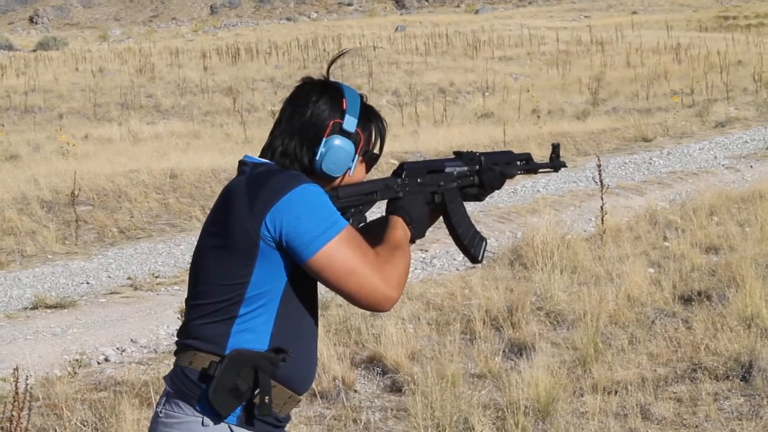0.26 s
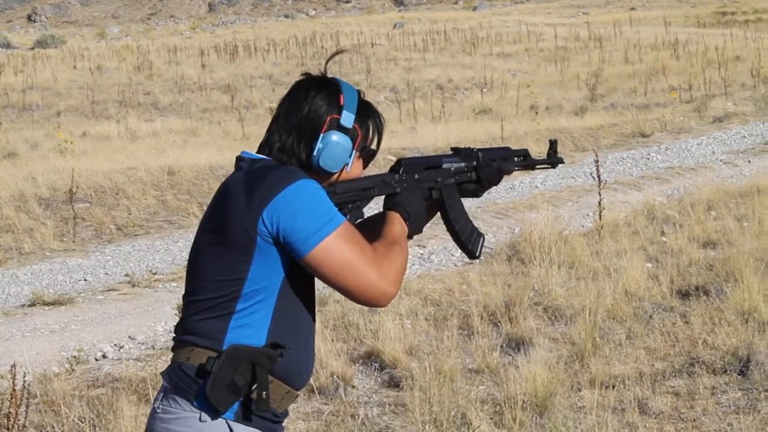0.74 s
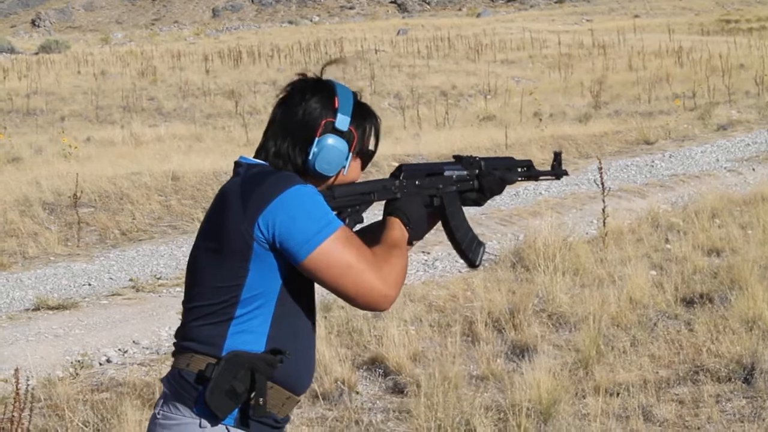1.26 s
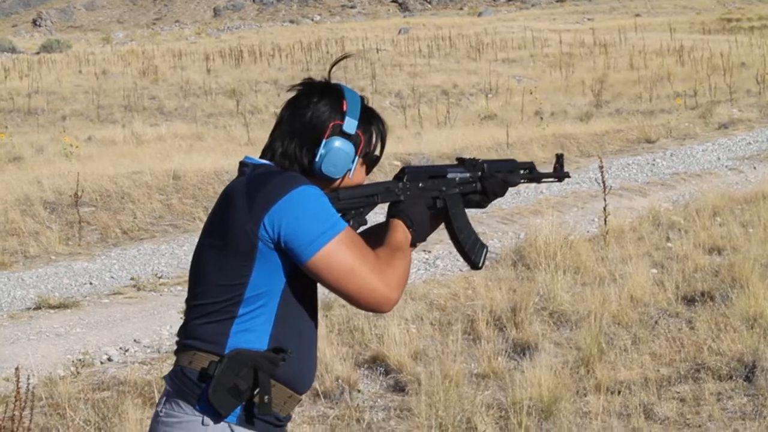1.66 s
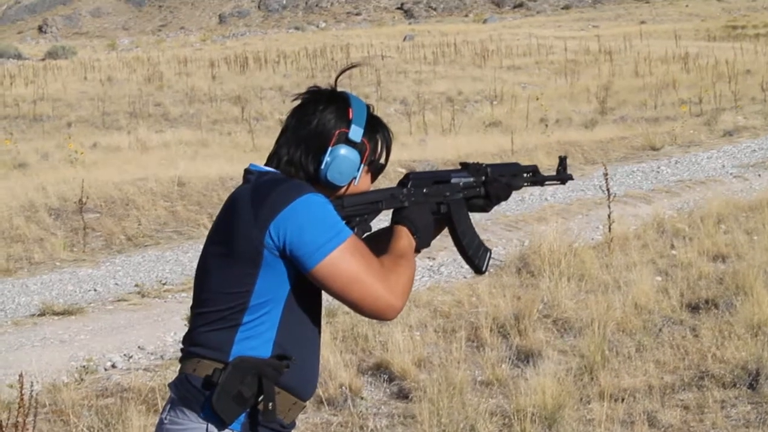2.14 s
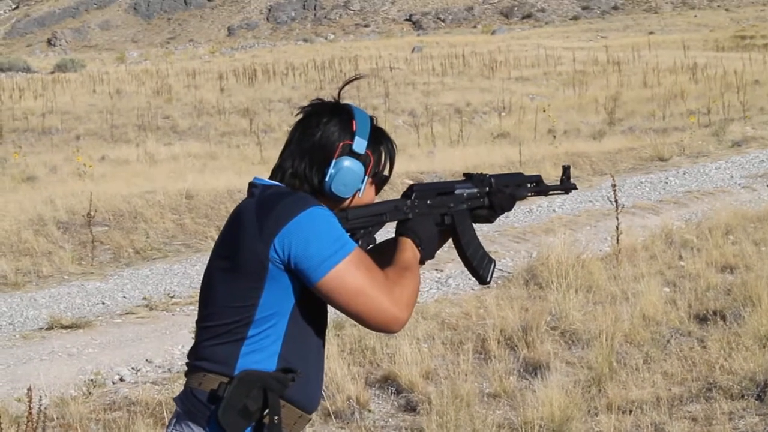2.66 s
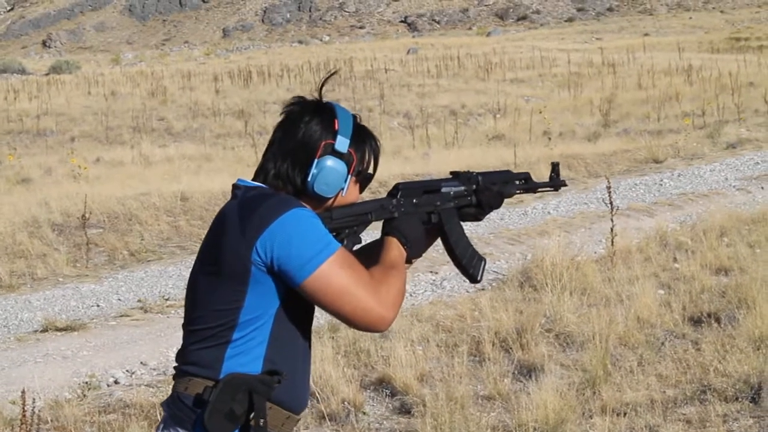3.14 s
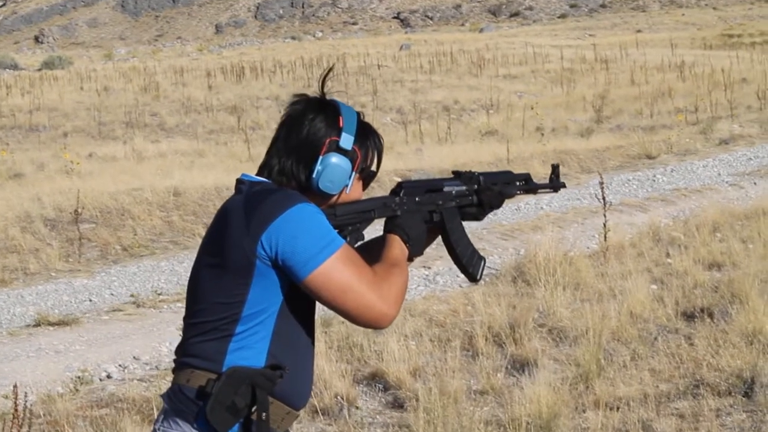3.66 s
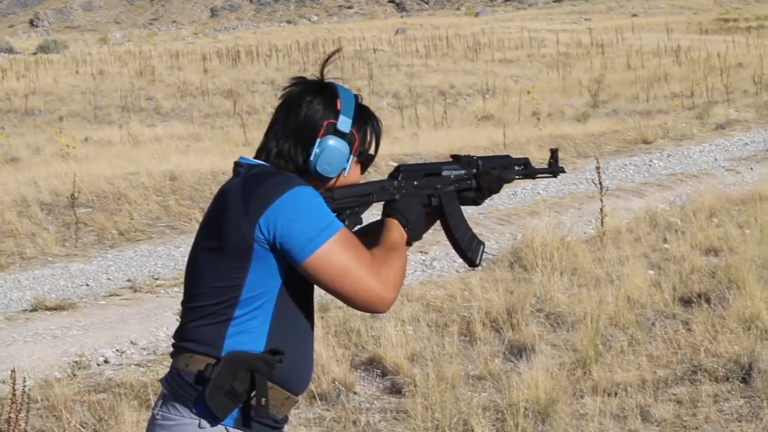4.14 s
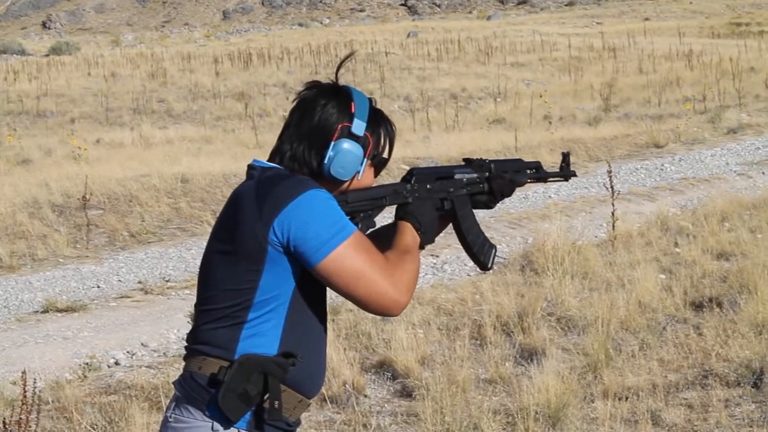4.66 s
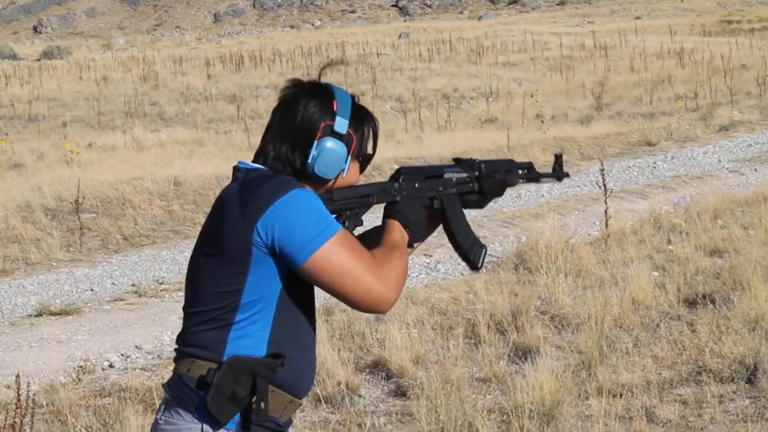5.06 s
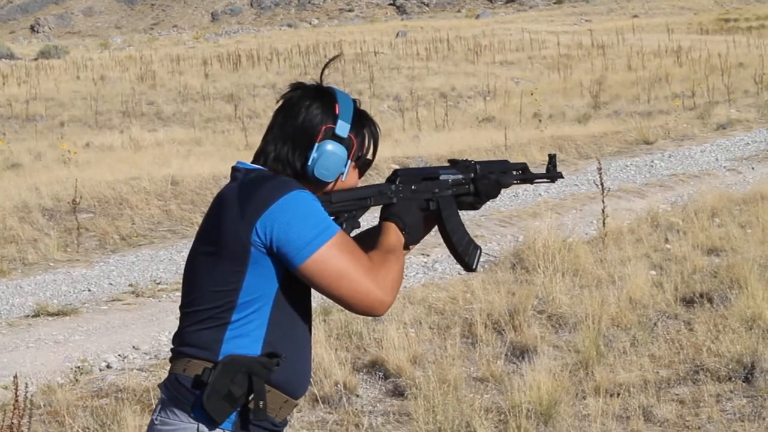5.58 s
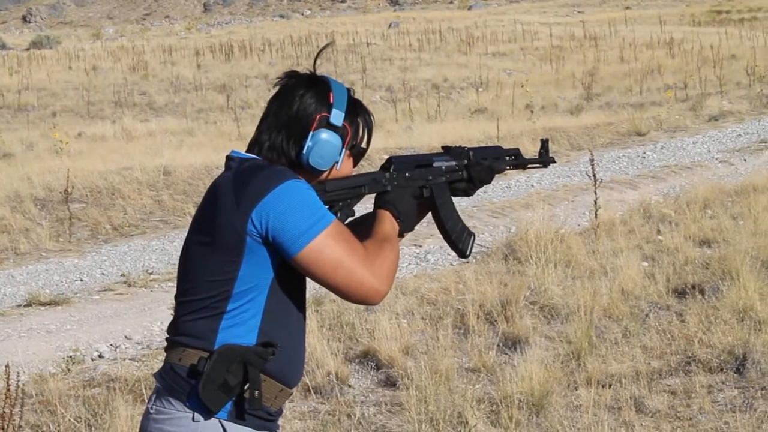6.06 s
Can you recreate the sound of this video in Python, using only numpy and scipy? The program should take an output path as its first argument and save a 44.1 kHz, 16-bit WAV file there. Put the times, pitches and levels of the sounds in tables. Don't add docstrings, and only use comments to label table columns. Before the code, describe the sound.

Wind bumps and dry grass ticks, then three harsh close gunshots with steel bolt clacks, rolling echoes, bright case rings and a falling ricochet whine.

```python
import sys
import numpy as np
from scipy import signal
from scipy.fft import rfft, irfft, next_fast_len
from scipy.io import wavfile
from scipy.ndimage import map_coordinates

SR = 44100
rng = np.random.default_rng(int(sys.argv[2]) if len(sys.argv) > 2 else 0)


def digitize_waveform(pressure):
    field = np.atleast_2d(pressure).T
    bounded = np.clip(field, -1, 1)
    quanta = np.round(bounded * 32767).astype(np.int16)
    wavfile.write(sys.argv[1], SR, quanta)


def invert_db(x):
    u = np.asarray(x, float) / 20
    return 10 ** u


N = 278271

# (time [s], blast before overload [dB], length [s], pressure push [dB], hammer fall [dB])
SHOTS = [
    (1.163, 2.5, 0.0041, -11.5, -35),
    (2.914, 3, 0.0044, -7.5, -35.5),
    (4.968, 4.998, 0.0037, -8, -36),
]
GAIN_SLACK_DB = [8.2, 0.25, 3.8, 2.3, .3]
# (time [s], level [dB])
CLEAR_DB = [(1.2, 1), (1.232, -8.5), (1.245, 1.5), (1.27, 2), (1.3, -16.5), (1.52, -12.5), (1.6, -1.5),
            (2.95, 2), (2.985, -3), (3.0, 4.5), (3.055, 5.5), (3.08, -1), (3.14, -2.5), (3.25, -6),
            (3.35, -0.5), (5.07, -0.5), (5.085, -4), (5.13, -7), (5.2, -2), (5.3, 1.5)]


def unit(x):
    return x / np.sqrt(np.mean(x ** 2) + 1e-20)


def curves(rows):
    s, *cols = np.transpose(rows)
    return [np.interp(np.arange(N) / SR, s, c) for c in cols]


def filtered(x, response):
    m = next_fast_len(len(x) + 8192)
    return irfft(rfft(x, m) * response(np.fft.rfftfreq(m, 1 / SR)), m)[:len(x)]


def peak(hz, width_hz):
    return lambda f: 1j * f * width_hz / (hz * hz - f * f + 1j * f * width_hz)


def wobble(rate):
    return map_coordinates(rng.standard_normal(int(N * rate / SR) + 4), [np.arange(N) * rate / SR])


def noise(spectrum, lo, hi):
    f, db = np.transpose(spectrum)
    colour = lambda hz: invert_db(np.interp(np.log(hz + 1), np.log(f), db, right=-120))
    x = filtered(rng.standard_normal(N), colour)
    return x / np.std(filtered(x, lambda hz: (hz > lo) & (hz < hi)))


def add(track, s, sound):
    track[round(s * SR):][:len(sound)] += sound


def sounding(rows):
    start, end = rows[0][0], rows[-1][0]
    return np.interp(np.arange(N) / SR, [start - .002, start, end - .04, end], [0, 1, 1, 0])


def summed(*levels_db):
    return 10 * np.log10(sum(invert_db(db) ** 2 for db in levels_db))


def swell(age, first_db, swell_s, full_db, held_s, fall):
    rise_db = np.interp(age, [0, swell_s], [first_db, full_db])
    return rise_db - fall * np.maximum(age - max(held_s, swell_s), 0)


def repeated(x):
    since = np.arange(N) - np.round(np.array(SHOTS)[:, :1] * SR).astype(int)
    return x[np.where(since < 0, np.arange(N), since).min(axis=0)]


def thumps():
    # (time [s], peak [dB], frequency [Hz])
    eddies = [(.129, -44.5, 62), (0.385, -33.5, 135), (.503, -43, 100), (0.519, -39.5, 123),
              (0.541, -44, 100), (.72, -40.5, 80), (.759, -44, 88), (.848, -47.5, 62), (2.003, -22.5, 178),
              (2.13, -39, 166.4), (2.462, -33, 137.3), (2.476, -33, 150.3), (2.496, -34, 129.7),
              (2.539, -37.5, 141), (2.61, -35, 196), (3.708, -27.5, 183), (3.723, -37, 260),
              (3.798, -33, 226), (3.87, -28.5, 134), (3.917, -32, 169), (4.0288, -22, 220),
              (4.0405, -29, 240), (4.056, -37, 136), (4.212, -34.5, 163), (4.666, -38.5, 129),
              (4.735, -38, 150), (4.767, -25, 146), (4.827, -35.5, 156), (4.917, -38, 201),
              (4.931, -31, 210), (5.42, -27, 260), (5.713, -29.5, 186.5)]
    # (frequency [Hz], density [dB per Hz])
    buffet_colour = [(12, -40), (20, -6), (113, -4), (140, -0.5), (180, -28.5), (310, -120)]
    # (time [s], level [dB])
    buffet_level = [(0.0, -72.5), (0.7, -69.5), (0.88, -75.5), (2.02, -53), (2.56, -60.5), (2.67, -70.5),
                    (3.73, -52), (4.43, -65.5), (5.309, -48), (5.57, -50.5), (5.87, -63.5), (6.31, -72)]
    out, t = np.zeros(N + SR), np.arange(3000) / SR
    for s, db, hz in eddies:
        cycles = np.clip(0.9 - 0.012 * (db + 37.5), .3, 1.2)
        u = (t - .012) * hz / cycles
        puff = unit(filtered(rng.standard_normal(len(t)), lambda f: peak(2 * hz, 2 * hz)(f) ** 4))
        push_pull = np.sin(2 * np.pi * hz * (.012 - t))
        add(out, s, invert_db(db + 3.0) * np.exp(-3 * u * u) * (push_pull + 0.099 * puff))
    buffet_db = curves(buffet_level)[0] + 6 + 2.7 * wobble(15)
    return out[:N] + invert_db(buffet_db) * unit(noise(buffet_colour, 25, 120))


def ticks():
    # (time [s], peak [dB], low knock [dB], t60 [s])
    crunches = [(0.029, -38, -32, 0.012), (0.0666, -43, -1, 0.043), (0.0904, -38, 3.5, 0.11),
                (0.1076, -37, -8, 0.05), (.153, -35, -3, 0.1), (.214, -45, -8, .03), (0.222, -47, 0, 0.055),
                (0.3032, -45, -17, 0.035), (0.5366, -50, -6, 0.034), (0.7369, -35.5, -2.5, 0.085),
                (0.7635, -43, -22, 0.023), (0.776, -45, -6, 0.054), (.8028, -43, -4, 0.098),
                (0.8692, -42, -10, 0.032), (0.8897, -42, -24, 0.013), (.9239, -48, -10, .03),
                (.9488, -43, -5, 0.056), (1.0272, -41.5, -4.5, 0.033), (1.1003, -47, -8, 0.066),
                (1.113, -43, -5.5, .06), (1.753, -41.5, -7, .053), (1.953, -26, -2.5, 0.073),
                (2.636, -57, 18.5, 0.1), (3.688, -34, -10, 0.035), (3.7188, -57, 13, 0.03),
                (3.8247, -45, -9, 0.03), (3.877, -46, -4, .025), (4.024, -52, 4, .03),
                (4.5132, -31, -8, 0.035), (4.6275, -49, -8.5, 0.029), (4.669, -52.5, -1.5, .04),
                (4.724, -42.5, -15.5, 0.039), (4.8945, -37, -9, 0.045), (4.9182, -36, -10.5, .03),
                (4.941, -45, -16, .03), (5.9252, -47, 10, 0.053)]
    # (time [s], level [dB])
    scuff = [(4.8, -82.5), (4.825, -52), (4.87, -55.5), (4.92, -58.5), (4.96, -66)]
    out, t = np.zeros(N + SR), np.arange(4000) / SR
    for s, db, low_db, t60 in crunches:
        def colour(f):
            low = invert_db(low_db + 9.0) * peak(900, 600)(f) ** 3
            high = .6 * peak(3200, 3000)(f) ** 3
            middle = peak(1750, 350)(f) - peak(2450, 400)(f)
            return low + high + middle + invert_db(-23.5) * peak(6500, 4000)(f) ** 4
        grit = rng.standard_normal(len(t)) * invert_db(3 * rng.standard_normal(100).repeat(40))
        envelope = (1 - np.exp(-t / 0.0013)) * invert_db(-60 * t / np.clip(t60, .01, .3))
        crunch = filtered(grit * envelope, colour)
        add(out, s, invert_db(db - 3.5 + max(low_db, 0)) * crunch / np.abs(crunch).max())
    cloth = unit(filtered(rng.standard_normal(N), lambda f: peak(1400, 1500)(f) ** 3))
    return out[:N] + invert_db(curves(scuff)[0] + 0.96 * wobble(90)) * sounding(scuff) * cloth


def knocks():
    # (time [s], peak [dB], frequency [Hz], t60 [s])
    taps = [(0.087, -44, 420, 0.047), (.108, -41, 455, 0.041), (0.158, -48, 810, 0.078),
            (.227, -52, 497, 0.045), (0.726, -44.5, 330, 0.033), (4.512, -45, 600, 0.042),
            (.737, -41.5, 957, 0.033), (0.747, -48, 990, 0.036), (.775, -38, 910, 0.019),
            (0.7746, -42, 1720, 0.021), (.803, -38.5, 940, 0.018), (0.802, -44, 1740, 0.025),
            (.846, -55, 1750, .03), (0.865, -47.5, 1740, 0.03), (.871, -51, 800, 0.032),
            (2.456, -35, 140, .12), (2.499, -38.5, 140, .08), (2.515, -39, 140, .12),
            (2.641, -28, 1050, .012), (2.664, -39.5, 100, .08), (3.718, -40, 800, 0.019),
            (3.85, -34, 149.8, .06), (3.89, -39, 150, .06), (4.024, -44, 700, .02),
            (4.047, -31, 220, 0.054), (4.108, -40, 328, .03), (4.109, -46, 1000, .015),
            (4.195, -39, 151, .06), (4.411, -39.5, 140, .06), (4.667, -41, 600, 0.019),
            (4.7875, -8, 412, 0.014), (4.788, -28.5, 940, 0.0094), (4.794, -26.5, 105, 0.086),
            (4.82, -38, 131, .1), (3.137, -37, 2310, 0.025), (3.148, -36, 2820, 0.043),
            (4.977, -17.5, 1729, 0.069), (5.715, -37, 60.7, 0.21)]
    out, t = np.zeros(N + SR), np.arange(8000) / SR
    for s, db, hz, t60 in taps:
        envelope = invert_db(db + 4.0 - 60 * t / t60) * (1 - np.exp(-t * hz / 1.2))
        add(out, s, envelope * np.sin(2 * np.pi * hz * t))
    return out[:N]


def echo_levels():
    # (level [dB], held [s], fade [dB per s], far hills [dB], their fade [dB per s])
    echo_law = [
        (-28.5, 0.28, 104, -32, 25.5),
        (-23, .06, 60, -53, 9),
        (-28, 0.007, 79.5, -62.5, 14.5),
        (-32.5, 0.0076, 86.5, -74.5, 13),
        (-40.5, 0.1203, 138, -93, 13.5),
    ]
    # (time [s], gain [dB])
    gain_moves = [
        [(1.165, -3.5), (1.22, 0), (1.242, -5), (1.254, -14.5), (1.304, -18), (1.362, -9), (1.464, -7.5),
         (1.6, -10), (1.9, -1.8)],
        [(2.916, 0), (2.981, -2), (2.99, 0), (3.053, -19.5), (3.09, -12.5), (3.125, -6.5), (3.245, -10.5),
         (3.5, -7.5), (3.8, -5.5)],
        [(4.97, 0.8), (5.038, -2.5), (5.068, -4.5), (5.075, -9.5), (5.13, 3.5), (5.26, -0.2), (5.384, -5.5),
         (5.54, -5.5), (5.75, -2.5)],
    ]
    gain_share = [.9, 1.2, 1.01, .8, 0.83]
    # (time [s], strength [dB])
    wind = [(0, -59), (.29, -64.5), (.646, -65), (.886, -63), (1.15, -64), (1.98, -57), (2.2, -60.5),
            (2.51, -78), (2.66, -62.5), (2.9, -77.5), (3.76, -59.5), (4.13, -56), (4.63, -60),
            (4.83, -60.5), (4.95, -57.5), (5.78, -53.5), (6.31, -58)]
    # (level at calm strength [dB], growth [dB per dB])
    wind_law = [
        (-66.5, 0.2),
        (-60, 1),
        (-74.5, 0.38),
        (-80, 0.17),
        (-96.5, 0.4),
    ]
    calm_strength_db = -60
    gain_db, = curves(np.vstack(gain_moves))
    wind_db, = curves(wind)
    ages = np.arange(N) / SR - np.array(SHOTS)[:, :1] - .006
    age = np.where(ages < 0, 9, ages).min(axis=0)
    levels_db = []
    for law, share, slack_db, (calm_db, growth) in zip(echo_law, gain_share, GAIN_SLACK_DB, wind_law):
        db, held, fade, far_db, far_fade = law
        returns_db = summed(db - fade * np.maximum(age - held, 0), far_db - far_fade * age)
        ducked_db = returns_db + share * (gain_db + np.clip(-gain_db, 0, slack_db))
        breeze_db = calm_db + growth * (wind_db - calm_strength_db)
        levels_db.append(summed(ducked_db, breeze_db))
    return gain_db, levels_db


def slaps(gain_db):
    # (delay [s], peak [dB])
    far_faces = [(.145, -19), (.215, -21), (.245, -24), (.27, -23), (.306, -22.5), (.323, -19.5),
                 (.386, -27.5), (0.44, -33), (0.57, -41.5)]
    # (delay [s], peak [dB])
    near_faces = [(.0126, -15.5), (.0235, -17), (.0295, -17), (.0356, -10.5), (.0445, -11.5),
                  (.0496, -11.5), (.0515, -15), (.0575, -15), (.067, -16.5), (.0748, -12.5)]
    out, t = np.zeros(N), np.arange(-600, 600) / SR
    for faces, hz, cycles in ((far_faces, 272, 2), (near_faces, 600, 1.3)):
        pulse = np.exp(-3 * (t * hz / cycles) ** 2) * np.sin(2 * np.pi * hz * t)
        for s, *_ in SHOTS:
            for delay, db in faces:
                add(out, s + delay + t[0], invert_db(db) * pulse)
    return out * invert_db(gain_db + np.clip(-gain_db, 0, GAIN_SLACK_DB[0]))


def echo_rumble(rumble_db, lumps):
    # (frequency [Hz], density [dB per Hz])
    rumble_colour = [(35, -50.5), (60, -21), (162, -7), (203, 0.5), (275, -2), (366, -13), (420, -10.5),
                     (550, -40.5), (920, -120)]
    rumble = unit(invert_db(1.8 * lumps) * noise(rumble_colour, 130, 380)) * invert_db(rumble_db)
    rumble = filtered(rumble, lambda f: (1j * f / (90 + 1j * f)) ** 2)
    near_share = np.clip((rumble_db + 48.5) / 16, 0, 1)
    near = invert_db(rumble_db) * repeated(rumble / invert_db(rumble_db))
    far = 1.61 * filtered(rumble, peak(140, 140))
    return near_share * near + (1 - near_share) * far


def echo_body(body_db, lumps):
    # (frequency [Hz], density [dB per Hz])
    body_colour = [(190, -35.5), (330, -3.5), (517, -1), (752, -2), (933, -12), (1500, -10.5),
                   (1950, -36.5), (3300, -120)]
    # (frequency [Hz], density [dB per Hz])
    breeze_colour = [(190, -34), (330, -7), (453, -2.5), (590, 1), (774, -6.5), (981, -5.5), (1280, -12),
                     (1600, -14.5), (2080, -43), (3520, -120)]
    build_db, build_s = 5, .04
    shot_share = np.clip((body_db + 56.5) / 12, 0, 1)
    returns = np.sqrt(shot_share) * repeated(noise(body_colour, 400, 1150))
    breeze = np.sqrt(1 - shot_share) * noise(breeze_colour, 400, 1150)
    missing = np.clip(2 - 2 * repeated(np.arange(N) / SR) / build_s, 0, 1)
    level_db = body_db - build_db * missing + 1.2 * lumps + 1.5 * wobble(90) - .6
    return (returns + breeze) * invert_db(level_db)


def echo_treble(edge_db, air_db, top_db):
    # (frequency [Hz], density [dB per Hz])
    edge_colour = [(710, -26), (1200, 0), (1420, -5.5), (1700, 2.5), (1900, 0), (4500, -9), (5850, -37),
                   (9900, -120)]
    air_colour = [(2240, -28.5), (3800, -4), (5840, -4.5), (6670, -6), (9000, -13.5), (11700, -46.5),
                  (19800, -120)]
    top_colour = [(5000, -30.5), (8500, -5), (10800, -8), (13300, -6), (15800, -14.5)]
    edge = invert_db(edge_db + 1.3 * wobble(70) - 0.46) * noise(edge_colour, 2093, 2650)
    flutter_db = 1.9 * wobble(80)
    air = invert_db(air_db + flutter_db - 0.44) * noise(air_colour, 5290, 6120)
    top_level_db = top_db + 1.4 * flutter_db - 1 + curves(CLEAR_DB)[0]
    return edge + air + invert_db(top_level_db) * unit(noise(top_colour, 9000, 15000))


def echo():
    gain_db, (rumble_db, body_db, *treble_db) = echo_levels()
    lumps = repeated(wobble(55))
    low = echo_rumble(rumble_db, lumps) + echo_body(body_db, lumps)
    return slaps(gain_db) + low + echo_treble(*treble_db)


def whine():
    # (time [s], frequency [Hz], level [dB])
    glides = [
        [(1.34, 2800, -56), (1.39, 3040, -47), (1.46, 3300, -60), (1.49, 3330, -70)],
        [(1.41, 2050, -55), (1.46, 2360, -53), (1.53, 2250, -58), (1.61, 2314, -57), (1.73, 2070, -67)],
        [(1.46, 1600, -68), (1.52, 2000, -51), (1.57, 2220, -60)],
        [(5.17, 1327, -37), (5.27, 1168, -40), (5.4, 982, -51), (5.56, 709.5, -58), (5.8, 572.5, -57.5)],
    ]
    out = np.zeros(N)
    for rows in glides:
        hz, db = curves(rows)
        phase = 2 * np.pi * np.cumsum(hz + 28 * wobble(150)) / SR
        harmonics = (hz < 1400) * (0.33 * np.sin(2 * phase) + 0.24 * np.sin(3 * phase))
        out += sounding(rows) * invert_db(db + 1.5 * wobble(56)) * (np.sin(phase) + harmonics)
    return out


def glints():
    # (from [s], loudest [s], until [s], frequency [Hz], level [dB])
    flashes = [(1.35, 1.435, 1.495, 4930, -29), (1.34, 1.37, 1.41, 4610, -48),
               (1.49, 1.54, 1.68, 4795, -63), (1.41, 1.46, 1.485, 9010, -58),
               (1.26, 1.33, 1.42, 11480, -52), (1.26, 1.3, 1.47, 9400, -56), (1.26, 1.28, 1.46, 15400, -60),
               (1.27, 1.36, 1.42, 14730, -64), (1.28, 1.33, 1.48, 12320, -58),
               (1.26, 1.28, 1.32, 13580, -56), (1.26, 1.29, 1.39, 10900, -55),
               (1.27, 1.35, 1.41, 8850, -56), (1.55, 1.585, 1.62, 6510, -64),
               (1.36, 1.42, 1.51, 13090, -56), (1.36, 1.43, 1.48, 10040, -60),
               (3.02, 3.042, 3.068, 3375, -36), (3.03, 3.075, 3.12, 2750, -44),
               (3.09, 3.125, 3.175, 2760, -46), (3.088, 3.105, 3.13, 1920, -43),
               (3.03, 3.065, 3.13, 4190, -35), (3.1, 3.125, 3.165, 4220, -34),
               (3.04, 3.055, 3.08, 4290, -41), (3.09, 3.098, 3.11, 4150, -36),
               (2.995, 3.002, 3.014, 4770, -25), (3.02, 3.035, 3.06, 4900, -34),
               (3.12, 3.165, 3.225, 4928, -39), (3.1, 3.14, 3.19, 3380, -45),
               (3.025, 3.04, 3.07, 6200, -44), (3.2, 3.25, 3.32, 11780, -82),
               (3.02, 3.037, 3.06, 13050, -46), (3.025, 3.045, 3.06, 15200, -50),
               (3.03, 3.05, 3.085, 10350, -49), (3.12, 3.17, 3.25, 13100, -60),
               (3.14, 3.18, 3.21, 8170, -47), (3.02, 3.04, 3.06, 9400, -50)]
    out, flicker, shake = np.zeros(N), wobble(70), wobble(80)
    for start, top, end, hz, db in flashes:
        at = np.arange(round(start * SR), round(end * SR))
        t, own = at / SR, (at + rng.integers(N)) % N
        window = np.sin(np.interp(t, [start, top, end], [0, np.pi / 2, 0])) ** 2
        tone = np.sin(2 * np.pi * hz * t + .6 * shake[own])
        out[at] += invert_db(2.5 + db + 2.5 * flicker[own]) * window * tone
    return out


def cases():
    # (ejected [s], ring lasts [s], low tone lasts [s], final pitch ratio [1], first sag of it [1])
    ejections = [
        (1.244, 0.42, 0.42, .9998, .001),
        (2.994, .31, 0.56, 1, .007),
    ]
    # (first [dB], swell [s], full [dB], held until [s], fall [dB per s])
    swells = [
        [(-29.5, 0.093, -36, .105, 800.5), (-21.5, .104, -22.5, 0.17, 601.5), (-36, 0.09, -38, 0.18, 298),
         (-64.5, .164, -45, 0.19, 188)],
        [(-17.5, .036, -22.5, .037, 684), (-35.5, .065, -20, 0.13, 520), (-41, 0.04, -23.5, 0.164, 520),
         (-69.5, 0.16, -46.5, .145, 46)],
    ]
    # (time [s], level [dB])
    facings = [
        [(1.27, -40.5), (1.32, -48), (1.486, -26), (1.522, -59.5), (1.548, -33.5), (1.612, -47.5), (1.686, -75),
         (1.802, -62.5), (1.87, -88.5)],
        [(3.02, -44), (3.056, -33.5), (3.102, -54.5), (3.144, -42), (3.174, -43.5), (3.538, -63), (3.57, -92),
         (3.64, -69), (3.76, -90)],
    ]
    # (turn [s], first peak [s])
    tumble = [
        (0.062, 0.055),
        (.075, 0.059),
    ]
    # (high [Hz], low [Hz])
    long_hz = [
        (7793, 1276),
        (7798, 1276),
    ]
    mouth_hz = [1952, 2757]
    main_hz = [4795, 4926, 4212, 3385, 4441, 4690, 6503, 9590, 10045, 11150, 12026, 12500, 13105]
    upper_hz = [8180, 7018, 10390, 11780, 12960, 14160, 15075]
    # (in first case [dB], in second case [dB], extra fade [dB per s])
    mouth = [(0, -1.5, -0.5), (-5, -41, -1)]
    main = [(1, -3, 3), (-20, -22.5, -0.5), (-6.5, -31, 151.5), (-39, -46, 80.5), (-25, -29, 58.5),
            (-32, -26.5, 59.5), (-25, -23, 86.5), (-37, -44, 60), (-34, -41, 52), (-36.5, -45, 50),
            (-29.5, -38.5, 67.5), (-34.5, -41.5, 99.5), (-29.5, -32.5, 20)]
    upper = [(6, 0.6, 51), (-12, -9, 70), (-25.5, -29.5, 58.5), (-27.5, -37, 60), (-24.5, -32, 60.5),
             (-17, -24, 100), (-21, -28.5, 80)]
    after = [-65.5, -57, -57]
    settle_s, dip_db = 0.051, -13.5
    out, t = np.zeros(N), np.arange(N) / SR
    for which, (s, lasts, low_lasts, ratio, droop) in enumerate(ejections):
        rows, facing = swells[which], facings[which]
        turn_s, peak_s = tumble[which]
        age = np.maximum(t - s, 0)
        clock = np.cumsum(ratio - droop * np.exp(-age / settle_s)) / SR
        shake = wobble(70)
        clear = np.clip((age - .022) / .008, 0, 1)
        ringing = sounding([[s], [s + lasts]])
        for tones, modes, row, after_db in zip((mouth_hz, main_hz, upper_hz), (mouth, main, upper), rows, after):
            level_db = np.maximum(swell(age, *row), after_db)
            if tones is upper_hz:
                turning = np.abs(np.cos(np.pi * (age - peak_s) / turn_s))
                level_db += 20 * np.log10(turning + invert_db(dip_db))
            for k, (hz, (*db, fade)) in enumerate(zip(tones, modes)):
                flicker_db = (3.5 if k else .8) * wobble(25) - 1.5 * np.maximum(-52 - level_db, 0)
                mode_db = 4.5 + level_db + db[which] - fade * np.minimum(age, .22) + flicker_db
                tone = np.sin(2 * np.pi * hz * clock + (.3 if k else .1) * shake)
                out += ringing * invert_db(mode_db) * (clear if hz > 9000 else 1) * tone
        high_hz, low_hz = long_hz[which]
        out += sounding(facing) * invert_db(3.0 + curves(facing)[0]) * np.sin(2 * np.pi * high_hz * clock)
        low_size = sounding([[s], [s + low_lasts]]) * invert_db(5.0 + swell(age, *rows[3]))
        out += low_size * np.sin(2 * np.pi * low_hz * t)
    return out


def bolt():
    # (time [s], peak [dB], length [s], clank [dB], brightness [Hz])
    contacts = [(1.189, -20, .004, -20, 8970), (1.24, 8, 0.0015, 3, 5000), (1.243, -28, .022, -8, 8000),
                (1.257, -25, .006, -21, 8030), (2.943, -18.5, 0.0044, -22, 9015),
                (2.991, 0, .0018, 15, 4500), (3.011, -14, 0.0037, -12, 6000), (3.02, -38, .08, 6, 3200),
                (4.998, -25, 0.0055, -13, 8050), (5.0471, -5.5, 0.0017, -9.5, 2990),
                (5.016, -14, .002, -7, 4000), (5.057, -21, 0.013, -12.5, 5930),
                (5.065, -10.5, 0.0043, -11.5, 5010), (5.115, -15, 0.0036, 0, 5800),
                (5.105, -48, .09, 22, 2000)]
    # (frequency [Hz], width [Hz], level [dB])
    receiver = [(1830, 500, 2.5), (2530, 1100, -7)]
    out, t = np.zeros(N), np.arange(8000) / SR
    for s, db, length, clank_db, bright_hz in contacts:
        burst = rng.standard_normal(len(t)) * invert_db(db - 9.9 * (t / length) ** 1.6)
        clank = lambda f: sum(invert_db(level + 6.5) * peak(c, w)(f) for c, w, level in receiver)
        bright = lambda f: peak(bright_hz, 1.6 * bright_hz)(f) ** 3
        add(out, s, filtered(burst, lambda f: bright(f) + invert_db(clank_db) * clank(f)))
    return out


def shots():
    out, t = np.zeros(N), np.arange(2000) / SR
    gas_colour = lambda f: 0.71 * peak(4500, 5000)(f) ** 2 + 1.3 * peak(1900, 1800)(f)
    for s, db, length, push_db, hammer_db in SHOTS:
        gas = unit(filtered(rng.standard_normal(len(t)), gas_colour))
        u = np.maximum(t - .0022, 0) / .0005
        push = invert_db(push_db) * 3 * u * (2 - u) * np.exp(-u)
        fade_db = 14 * (t / length) ** 1.7 * (t < 3 * length) + 200 * (t >= 3 * length)
        add(out, s, invert_db(db - fade_db) * gas + push)
        rattle = unit(filtered(rng.standard_normal(len(t)), lambda f: peak(2500, 3500)(f) ** 2))
        add(out, s - .0075, invert_db(hammer_db) * rattle * (t < .0075) * np.minimum(t / 0.0023, 1))
    return out


def scene():
    background = thumps() + ticks() + knocks() + echo()
    return (background + whine() + glints() + cases() + bolt() + shots())[None]


def low_pass(x):
    return signal.sosfilt(signal.butter(12, 16970, fs=SR, output="sos"), x)


def record(dry):
    # (frequency [Hz], density [dB per Hz])
    hiss_colour = [(3530, -29), (6000, -6), (7140, 0.5), (8230, -2), (9360, -5.5), (10900, -6), (15300, -7),
                   (15550, 5.5), (16200, -4)]
    clipped = dry[0] / (1 + np.abs(dry[0] / .48) ** 6) ** (1 / 6)
    hiss = invert_db(-76.5 + .6 * curves(CLEAR_DB)[0]) * noise(hiss_colour, 8000, 16200)

    def colour(f):
        bass_cut = 1j * f / (60 + 1j * f)
        shelf_db = -22 / (1 + np.exp(np.clip((15950 - f) / 60, -50, 50)))
        return bass_cut * invert_db(shelf_db) * np.clip((16900 - f) / 400, 0, 1)
    return low_pass(filtered(clipped + hiss, colour)[None])


dry = scene()
out = record(dry)
digitize_waveform(out)
```